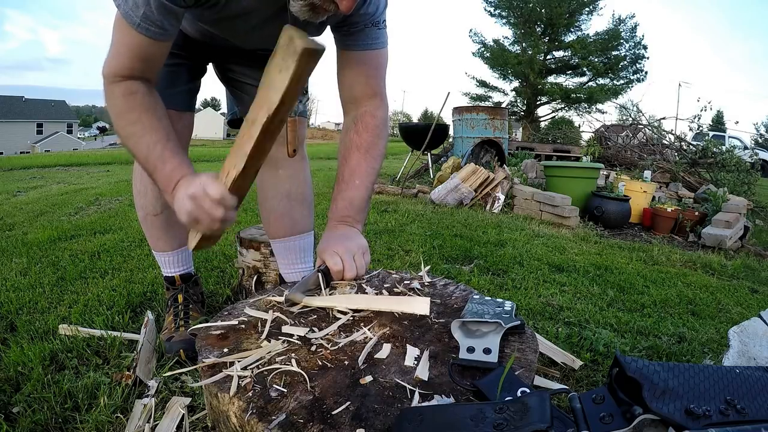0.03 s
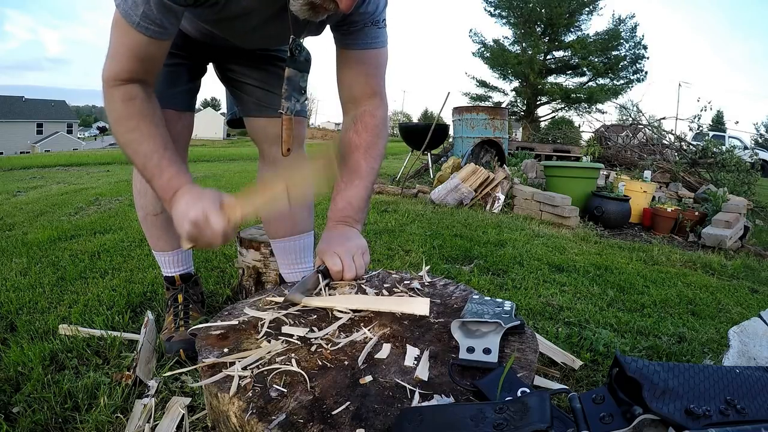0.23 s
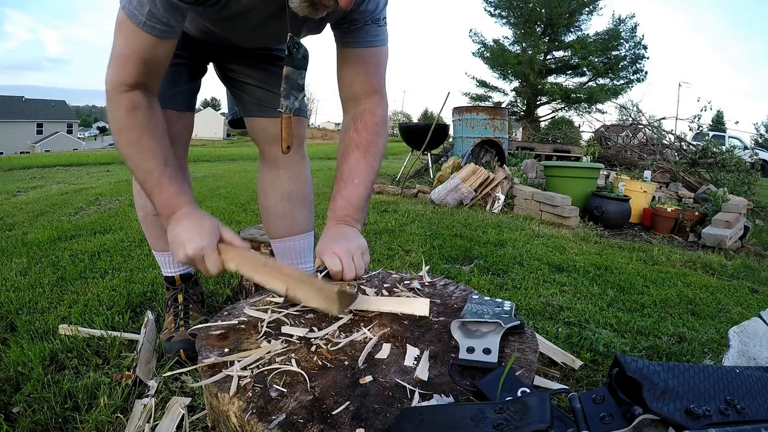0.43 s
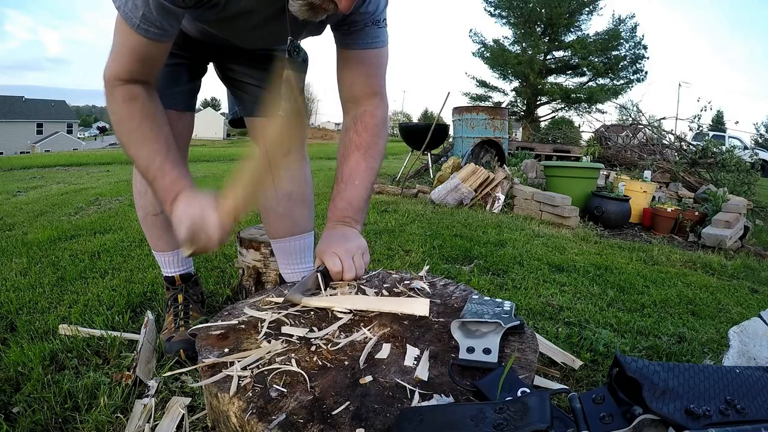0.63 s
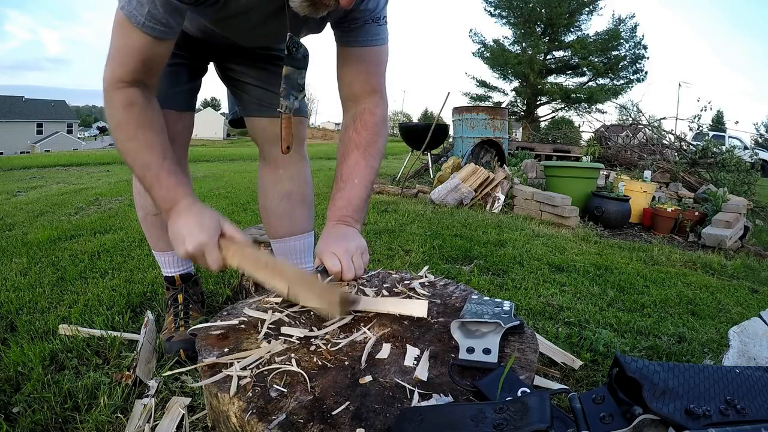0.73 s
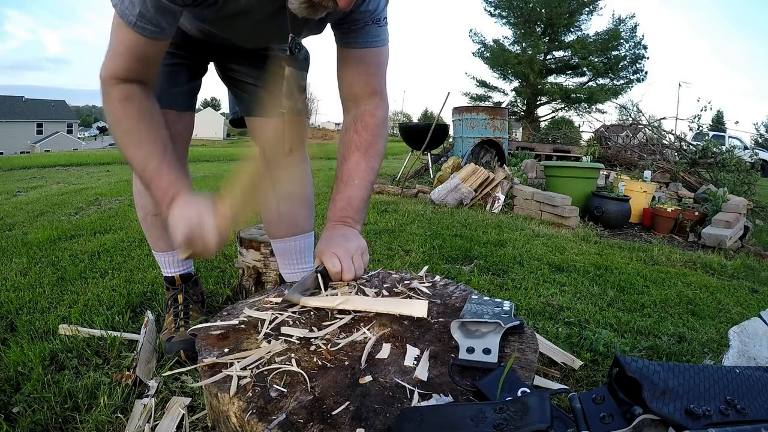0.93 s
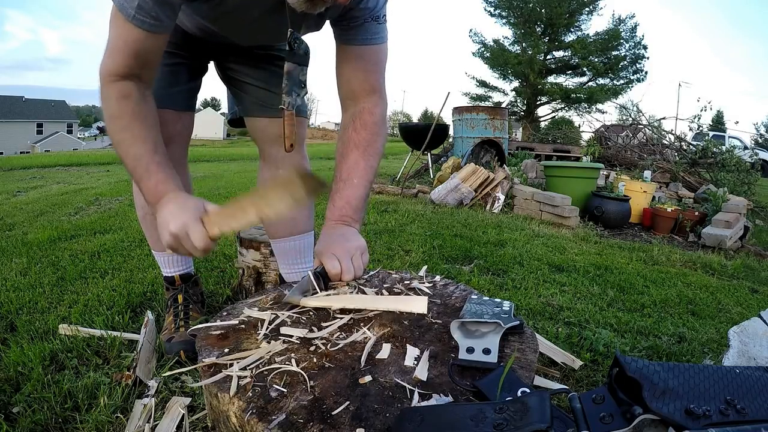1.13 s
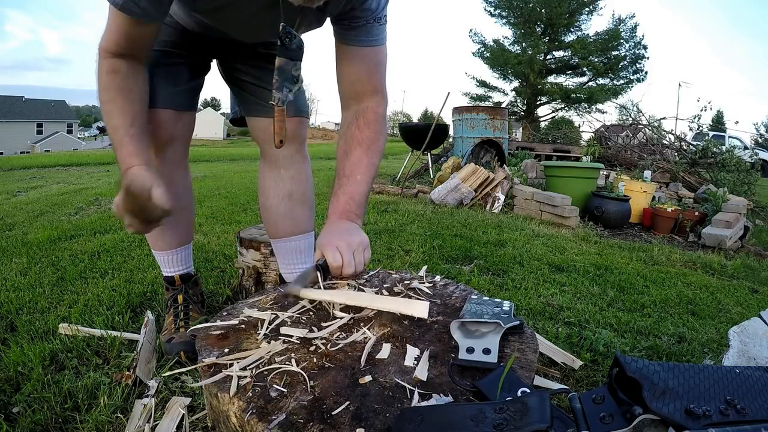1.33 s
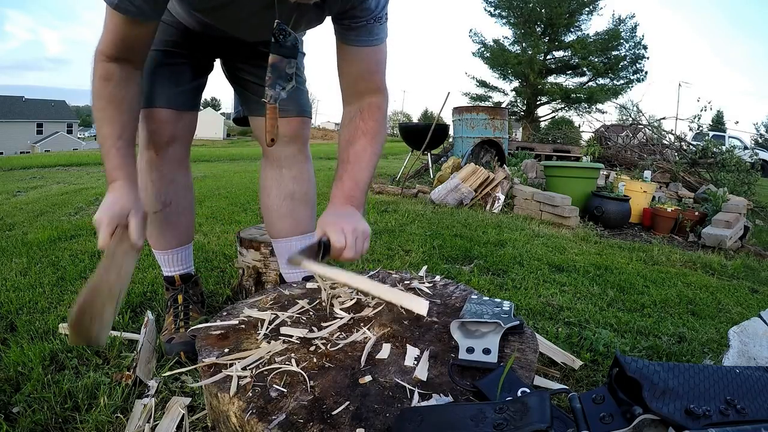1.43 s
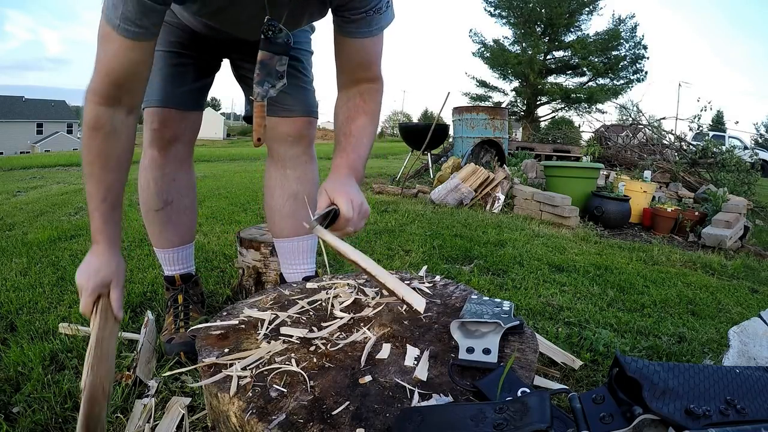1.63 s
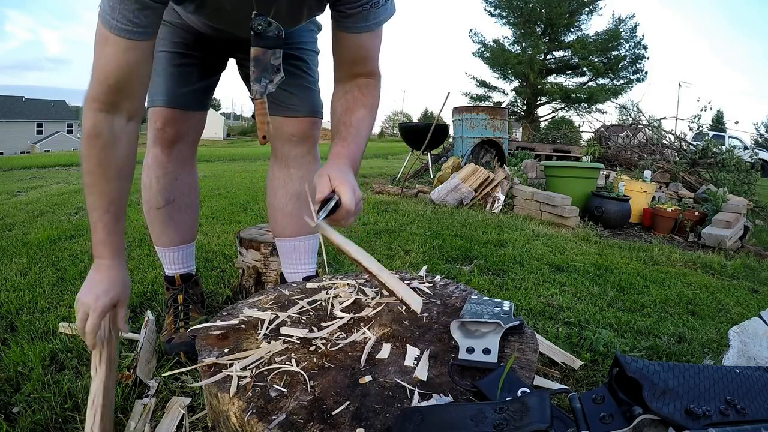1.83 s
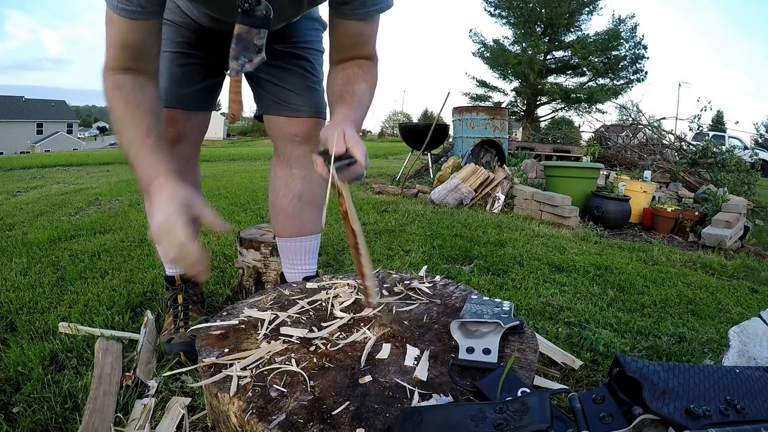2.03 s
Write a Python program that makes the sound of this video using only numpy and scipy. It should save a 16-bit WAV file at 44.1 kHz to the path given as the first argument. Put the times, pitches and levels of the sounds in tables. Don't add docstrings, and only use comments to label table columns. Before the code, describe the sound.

A wooden baton whacks a knife through a slat on a stump: four evenly spaced sharp cracks, the last ringing with steel, slapping echoes from far walls, then soft wooden knocks; close, overloaded microphone in a breezy yard.

```python
import sys
import numpy as np
from scipy import signal
from scipy.fft import rfft, irfft
from scipy.io import wavfile
from scipy.ndimage import uniform_filter1d

SR = 44100
rng = np.random.default_rng(int(sys.argv[2]) if len(sys.argv) > 2 else 0)


def ratio_of_db(decibels):
    return 10 ** (np.asarray(decibels, float) / 20)


def unload_wav(signal):
    wavfile.write(
        sys.argv[1],
        SR,
        np.round(np.clip(np.atleast_2d(signal).T, -1, 1) * 32767).astype(np.int16),
    )


N = 92610
LEAD = SR // 5
DETUNE = 0.005

# start_s, level_db, slat_brightness_db, stump_db, steel_db
BLOWS = [
    (-.0695, 5.5, -12, 9, 18.5),
    (.2124, 1.5, 2.5, 1, 1),
    (.4907, 2, 2.5, 1, 4),
    (.7699, 1, 4, 1.5, 2),
    (1.0662, 3, 4, -3, 9),
]


def colour(x, points):
    hz = np.fft.rfftfreq(len(x), 1 / SR)
    f, db = np.transpose(points)
    curve_db = np.interp(np.log(hz + 1), np.log(f + 1), db, -70, -70)
    y = irfft(rfft(x) * ratio_of_db(curve_db), len(x))
    return y / np.sqrt(np.mean(y ** 2))


def add(mix, s, sound):
    part = mix[LEAD + round(s * SR):][:len(sound)]
    part += sound[:len(part)]


def ring(modes, t, rise, stretch):
    t = np.maximum(t, 0)
    push = 1 - np.exp(-(t / rise) ** 2)
    return push * sum(ratio_of_db(db - 60 * t / t60) * np.sin(2 * np.pi * hz * k * t)
                      for (hz, db, t60), k in zip(modes, stretch))


def slow(rate):
    t = np.arange(N) / SR
    y = sum(np.sin(2 * np.pi * (f * t + rng.random())) for f in np.geomspace(rate / 10, rate, 20))
    return y / y.std()


def blow(db, slat_db, stump_db, steel_db):
    # pitch_hz, level_db, t60_s
    baton_modes = [(941.8, -10.5, 0.044), (987.4, -9.5, .028), (1350, -12.5, 0.036), (1448, -13, 0.033),
                   (1737, 2, 0.008), (1900, 6, 0.012), (2145, -5, 0.024)]
    slat_modes = [(2296, -15, .016), (2496, -7.5, 0.022), (2726, -8.5, .018), (2934, -3.5, 0.016),
                  (3201, -8.5, .02), (3750, -17, 0.013), (4123, -15, .025), (4808, -12.5, 0.017)]
    steel_modes = [(4373, -12, 0.017), (5080, -20.5, .024), (5452, -23.5, 0.03), (6140, -26.5, 0.021),
                   (7880, -40.5, .045), (8190, -32.5, .022)]
    # pitch_hz, level_db, t60_s
    stump_modes = [(61, -21, 0.29), (61, -11, 0.04), (176.04, -10.5, 0.035), (265, -10, 0.044),
                   (322.3, -7.5, 0.059), (435.2, -4, 0.035), (530, -6.5, 0.03), (606.2, -5.5, .028)]
    # pitch_hz, level_db
    crack_colour = [(1400, -29), (2800, -5.5), (4300, -12), (6000, -19.5), (9000, -26.5), (13000, -22.5),
                    (15500, -34)]
    # pitch_hz, level_db
    thud_colour = [(90, -1.5), (200, -4), (500, -0.5), (680, -5), (820, -20.5), (1250, -7.5), (1900, -9),
                   (2600, -24.5)]
    rise_s, stump_rise_s = 0.001, 0.0008
    stump_lag_s, ground_lag_s = 0.0012, 0.0035
    slap_s, slap_db = 0.00244, -15

    t = np.arange(SR // 2) / SR
    k = 1 + DETUNE * rng.standard_normal((4, 10))

    fibres = colour(rng.standard_normal(len(t)), crack_colour) * np.minimum(t / rise_s, 1)
    crack = fibres * (ratio_of_db(-16 - 60 * t / 0.021) + ratio_of_db(-39.5 - 60 * t / 0.094))
    bark = colour(rng.standard_normal(len(t)), thud_colour)
    thud = bark * np.minimum(t / 0.004, 1) * ratio_of_db(-23.5 - 60 * t / 0.067)

    damping = 1 - 0.47 * np.clip(steel_db / 15, 0, 1) ** 2
    damped_baton = [(hz, mode_db, t60 * damping) for hz, mode_db, t60 in baton_modes]
    wood = 0
    for gain, u in [(1, t), (-ratio_of_db(slap_db), t - slap_s)]:
        baton = ring(damped_baton, u, rise_s, k[0])
        slat = ring(slat_modes, u, rise_s, k[1])
        wood = wood + gain * (baton + ratio_of_db(slat_db) * slat)

    ground = ring(stump_modes[:3], t - ground_lag_s, stump_rise_s, k[2])
    stump = ring(stump_modes[3:], t - stump_lag_s, stump_rise_s, k[2, 3:])
    low = ground - stump + thud
    steel = ring(steel_modes, t - stump_lag_s / 2, rise_s, k[3])
    return ratio_of_db(db) * (wood + ratio_of_db(slat_db) * crack + ratio_of_db(stump_db) * low + ratio_of_db(steel_db) * steel)


def yard():
    # delay_s, level_db, dullness_0_to_1
    walls = [(.1015, 4, 0.24), (.116, -22, 0.3), (.124, -16, 0.1), (0.131, 2.5, 0.47), (.145, -20, .1),
             (.161, 1, 1), (.174, -29, 0.4), (.18, -26, .3), (.184, -10, 1), (.205, -19, 0), (.211, -4, 1),
             (.218, -10, 0), (.223, 3.5, 0.6), (.252, -17, 0.3)]
    # pitch_hz, level_db, t60_s
    bright_tick = [(2800, -1, .009), (3380, 0, .012), (4300, -9, .01), (5300, -13, .005)]
    dull_tick = [(2250, 0, .01), (1750, -5, .007), (2700, -4, .007)]
    scatter_from_s, hold_s, scatter_t60_s = 0.11, 0.096, 0.4
    scatter_db = np.array([[-18], [-22.0]])

    t = np.arange(SR // 2) / SR
    out = np.zeros(LEAD + N)
    sparse = rng.standard_normal((2, len(t))) * (rng.random((2, len(t))) < 0.05)
    late = np.maximum(t - scatter_from_s - hold_s, 0)
    taps = sparse * (t > scatter_from_s) * ratio_of_db(scatter_db - 60 * late / scatter_t60_s)
    for s, db, dull in walls:
        taps[:, round(s * SR)] += ratio_of_db(db) * np.clip([1 - dull, dull], 0, 1)

    for s, db, slat_db, *_ in BLOWS:
        k = 1 + 3 * DETUNE * rng.standard_normal(5)
        back = sum(signal.fftconvolve(row, ring(modes, t[:2000], 0.001, k))
                   for row, modes in zip(taps, (bright_tick, dull_tick)))
        add(out, s, ratio_of_db(-44 + db + 0.3 * slat_db) * back)
    return out


def handling():
    # start_s, level_db, pitch_factor, tick_db
    knocks = [
        (1.395, -60.5, 1.8, -12),
        (1.873, -55, 2.05, 1),
        (1.914, -54.5, .88, 5),
        (1.985, -36, 1.04, -11),
        (2.008, -46.5, .85, 0.5),
        (2.026, -54, .8, -11),
    ]
    # pitch_hz, level_db, t60_s
    held_slat = [(976, -3, .022), (2154, 0.5, 0.036), (2410, 0, 0.014), (3370, -3, 0.018)]
    # pitch_hz, level_db
    tick_colour = [(1200, -3.5), (4000, 6), (7000, -6.5), (11500, -7), (15000, -15)]
    # start_s, length_s, level_db
    scuffs = [
        (1.371, 0.096, -71),
        (1.11, 0.0298, -63),
        (1.54, .08, -69),
        (1.856, 0.096, -62.5),
        (1.988, .07, -55),
    ]
    # pitch_hz, level_db
    scuff_colour = [(700, -8), (2000, 0.5), (4800, -6), (6500, -18), (15000, -22)]

    out = np.zeros(LEAD + N)
    t = np.arange(SR // 10) / SR
    for s, db, pitch, tick_db in knocks:
        tick = ratio_of_db(tick_db - 60 * t / 0.025) * colour(rng.standard_normal(len(t)), tick_colour)
        body = ring(held_slat, t, 0.00022, [pitch] * len(held_slat))
        add(out, s, ratio_of_db(db) * (body + tick))
    for s, length, db in scuffs:
        grains = rng.standard_normal(len(t)) * ratio_of_db(1.77 * rng.exponential(1, len(t)))
        grit = grains * (rng.random(len(t)) < 0.3)
        stroke = np.sin(np.pi * np.minimum(t / length, 1))
        add(out, s, ratio_of_db(db) * colour(grit, scuff_colour) * stroke)
    return out


def insects():
    # start_s, length_s, level_db
    chirps = [
        (-.01, .105, -66),
        (.45, .04, -72),
    ]
    trill_hz, trill_db, chirp_hz = 14160, -77.5, 6356
    pulse_s, pulse_on, pulse_from_s = 0.03337, 0.58, 0.005

    t = np.arange(LEAD + N) / SR
    phase = ((t - LEAD / SR - pulse_from_s) / pulse_s) % 1
    on = uniform_filter1d(1.0 * (phase < pulse_on), size=88)
    out = ratio_of_db(trill_db) * on * np.sin(2 * np.pi * trill_hz * t)
    for s, length, db in chirps:
        u = t[t < length]
        swell = np.sin(np.pi * u / length) ** 0.3
        add(out, s, ratio_of_db(db - 12 * u / length) * swell * np.sin(2 * np.pi * chirp_hz * u))
    return out


def breeze():
    # time_s, breeze_strength
    gusts = [(0, 0.0065), (0.502, -1.04), (0.999, -1), (1.302, -1.34), (1.499, -0.12), (1.8, 0.18),
             (2.1, 0.58)]
    # pitch_hz, level_db_per_hz
    rumble_colour = [(12, -46), (20, -1.5), (56, 2), (114, -7), (256, -18.5), (352, -24.5), (393, -25.5),
                     (900, -46.5), (1170, -71), (1980, -120)]
    hiss_colour = [(290, -28.5), (500, -6.5), (578, -6.5), (718, -12), (2100, -17.5), (3020, -19.5),
                   (14500, -35), (16000, -49.5)]

    gust = np.interp(np.arange(N) / SR, *np.transpose(gusts))
    rumble = colour(rng.standard_normal(N), rumble_colour) * ratio_of_db(-38 + 3 * gust + 1.5 * slow(35.0))
    hiss = colour(rng.standard_normal(N), hiss_colour) * ratio_of_db(-62.5 + 2.5 * gust + 0.7 * slow(17.0))
    return rumble + hiss


def scene():
    # start_s, level_db, slat_brightness_db, stump_db, steel_db
    bounces = [
        (0.2448, -23.5, -2, 5.5, -10.5),
        (.505, -27, 8, -0.5, 1.5),
        (0.5264, -26, -2.5, 9, -4),
        (0.7939, -19, -4.5, 9.5, -3.5),
        (1.09, -33.5, -2, 0.5, -5.5),
    ]
    mix = yard() + handling() + insects()
    for s, *strike in BLOWS + bounces:
        add(mix, s, blow(*strike))
    return (mix[LEAD:] + breeze())[None]


def roll_off(x):
    return signal.sosfilt(signal.butter(12, 16400, fs=SR, output="sos"), x)


def record(dry):
    ceiling, knee = 0.96, 6.0
    cut = signal.lfilter(*signal.butter(2, 38, "high", fs=SR), dry)
    clipped = cut / (1 + abs(cut / ceiling) ** knee) ** (1 / knee)
    band_limit = signal.firwin(151, 15250, fs=SR)[None]
    return roll_off(signal.oaconvolve(clipped, band_limit, "same"))


dry = scene()
out = record(dry)
unload_wav(out)
```